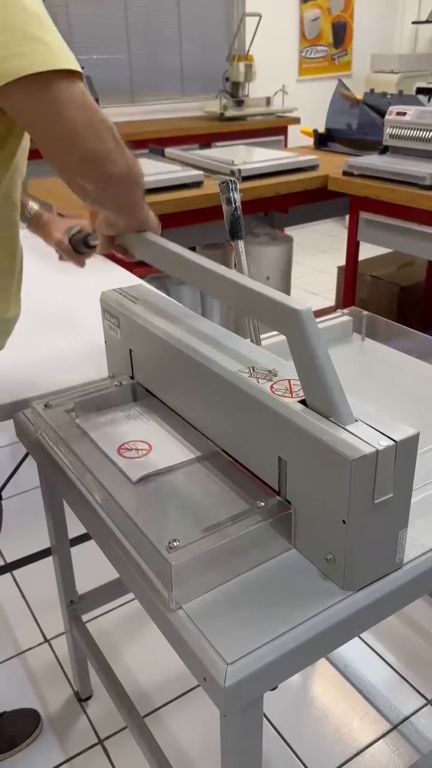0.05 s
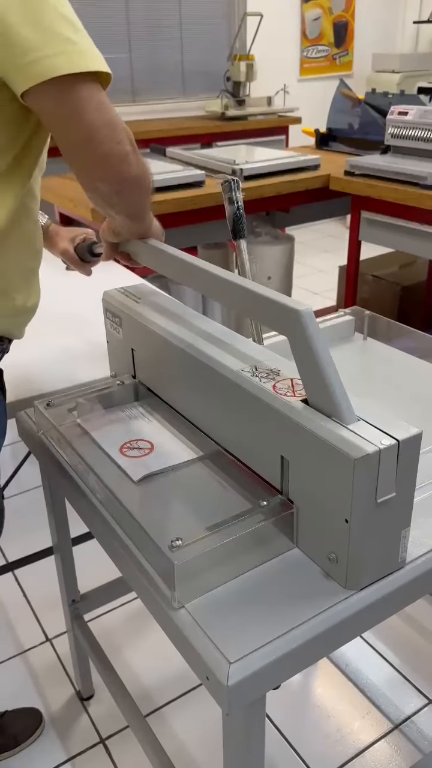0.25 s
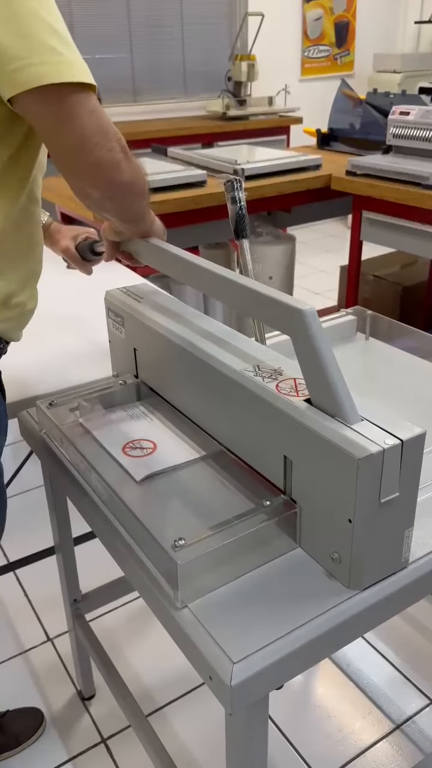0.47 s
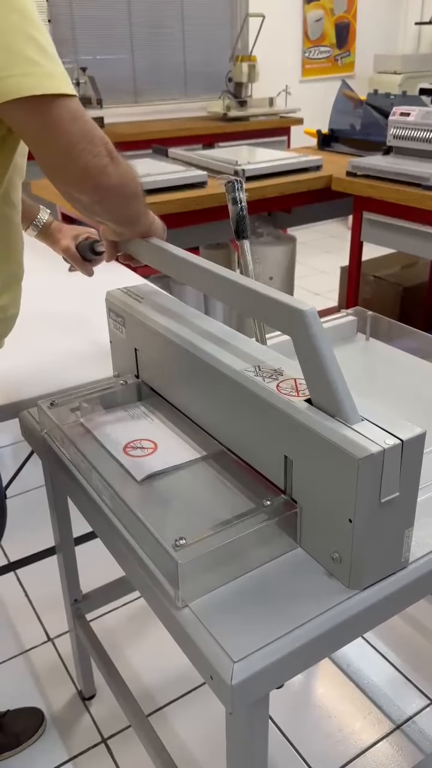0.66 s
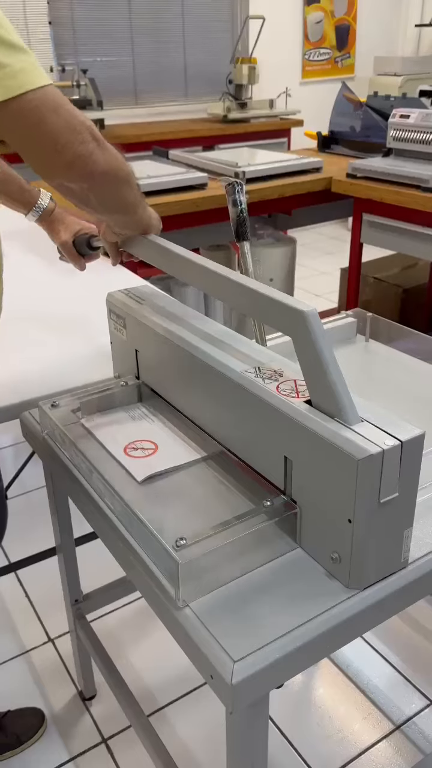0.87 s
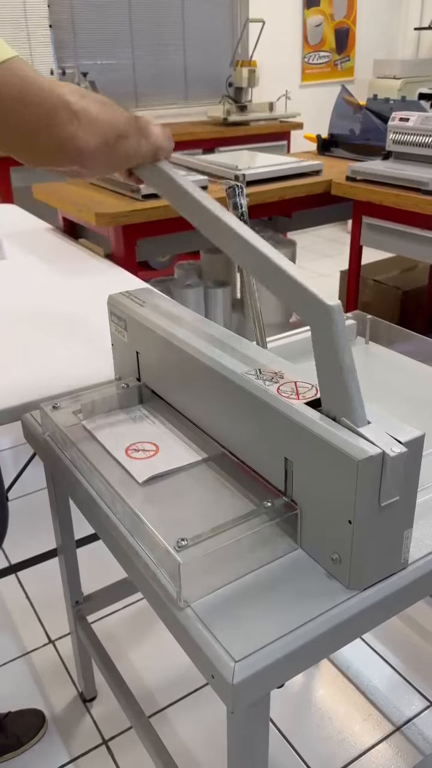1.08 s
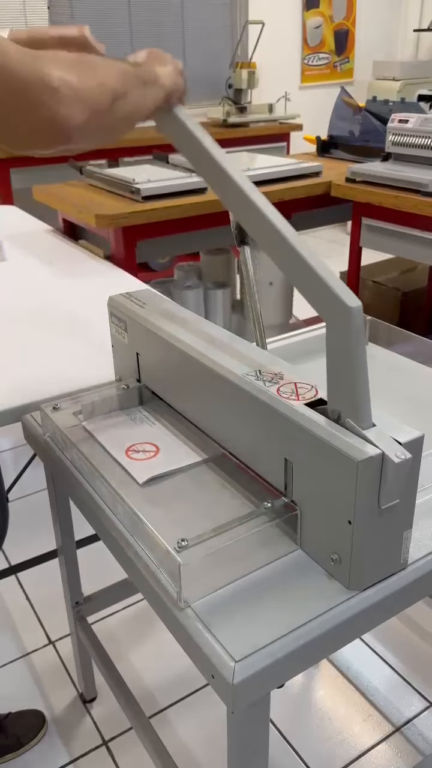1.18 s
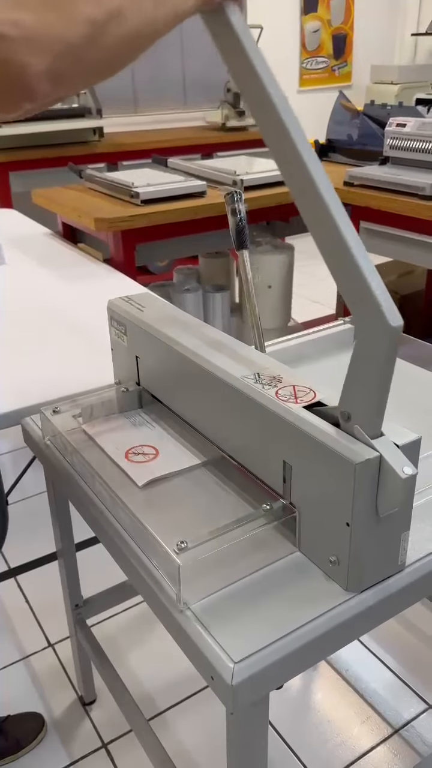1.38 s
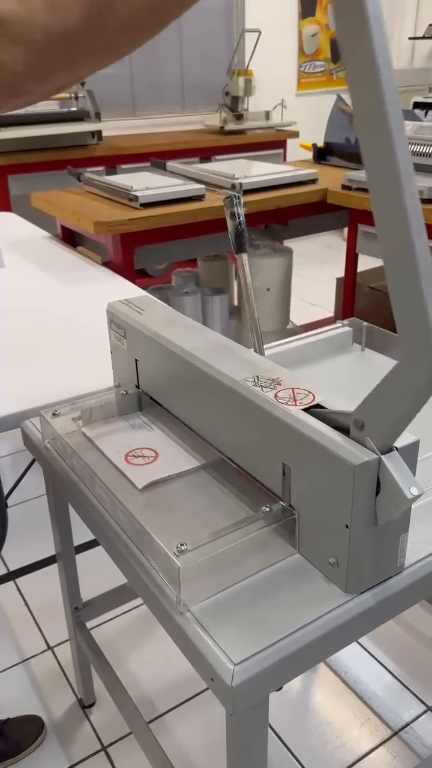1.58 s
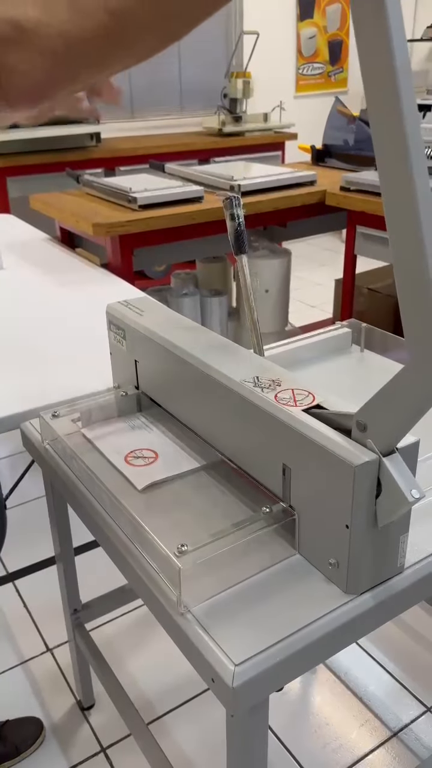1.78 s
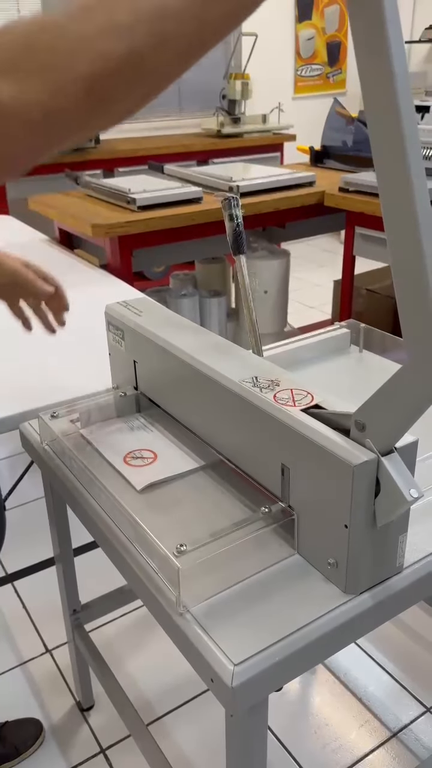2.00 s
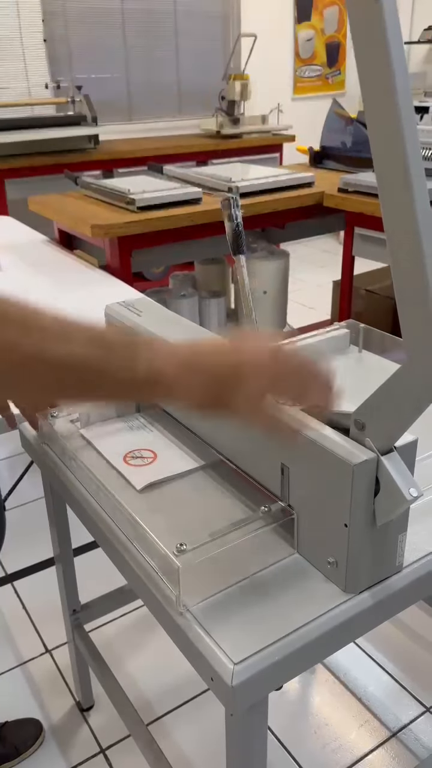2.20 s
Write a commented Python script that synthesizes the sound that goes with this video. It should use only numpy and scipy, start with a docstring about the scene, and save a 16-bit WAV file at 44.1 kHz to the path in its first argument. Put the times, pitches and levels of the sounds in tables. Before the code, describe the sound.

A lever paper cutter crunches through paper, then scrapes up and slams with a rattle.

```python
"""A crunch and a heavy clunk, then a scraping slide and a rattling steel slam: a lever paper guillotine
on a steel stand, close by in a tiled shop. The blade snaps through a stack of sheets and bottoms out.
The lever pulls free with a ping and a thump, groans up on its pivot and slams into its top catch,
which shakes the stand. Every contact rings the same frame and steel parts, over a low hum."""
import sys
import numpy as np
from scipy import signal
from scipy.fft import rfft, irfft
from scipy.io import wavfile

SR = 44100
rng = np.random.default_rng(int(sys.argv[2]) if len(sys.argv) > 2 else 0)


def digitize_waveform(pressure):
    """Quantize a signal to 16-bit integers and store it at the path in sys.argv[1].

    Rows of a 2-D input are taken as channels; values are limited to [-1, 1].
    """
    field = np.atleast_2d(pressure).T
    bounded = np.clip(field, -1, 1)
    quanta = np.round(bounded * 32767).astype(np.int16)
    wavfile.write(sys.argv[1], SR, quanta)


N = 99225


def amp(db):
    """Decibels to amplitude."""
    return 10 ** (np.asarray(db) / 20)


def at_hz(points, hz):
    """Read (Hz, value) points on a log-frequency axis."""
    freqs, values = np.array(points, float).T
    return np.interp(np.log(np.maximum(hz, 1)), np.log(freqs), values)


def conv(a, b):
    """Convolve along time, channel by channel."""
    return signal.fftconvolve(np.atleast_2d(a), np.atleast_2d(b), axes=-1)[:, :N]


def colour(x, points, size=4096):
    """Minimum-phase EQ through (Hz, dB) points: nothing rings ahead of an attack."""
    gain = amp(at_hz(points, np.fft.rfftfreq(size, 1 / SR)))
    cepstrum = irfft(np.log(gain))
    cepstrum[1:size // 2] *= 2
    cepstrum[size // 2 + 1:] = 0
    return conv(x, irfft(np.exp(rfft(cepstrum))))


def unit(x):
    """Scale to unit energy."""
    return x / np.sqrt(np.sum(x ** 2, axis=-1, keepdims=True))


def wash(t60s, build_s, size=32768, bands=14):
    """Countless overlapping rings as mid and side noise, each band dying at its own rate."""
    t, f = np.arange(size) / SR, np.fft.rfftfreq(size, 1 / SR)
    centres = np.geomspace(50, 12000, bands)
    noise, out = rfft(rng.standard_normal((2, size))), 0
    for hz, row in zip(centres, np.eye(bands)):
        share = at_hz(list(zip(centres, row)), f)
        envelope = np.exp(-np.log(1000) * t / at_hz(t60s, hz)) * (1 - np.exp(-t / build_s))
        out = out + unit(irfft(noise * share) * envelope) * np.sqrt(share.mean())
    return out


def modes(table):
    """One decaying sine per (Hz, dB, t60) row; the level sets its energy."""
    t = np.arange(N) / SR
    return np.array([amp(db) * unit(np.sin(2 * np.pi * hz * t) * np.exp(-np.log(1000) * t / t60))
                     for hz, db, t60 in table])


def strike(table, at_s, db):
    """One hit sets all the modes of a part ringing together."""
    return amp(db) * np.pad(modes(table).sum(axis=0), (int(at_s * SR), 0))[:N]


def grains(times, dbs, per_s, spread_db):
    """Tiny uneven clicks riding a level curve; 0 dB carries the energy of fifty unit clicks a second."""
    clicks = (rng.random(N) < per_s / SR) * rng.choice([-1, 1], N)
    strength = amp(spread_db * np.minimum(rng.exponential(size=N), 4))
    envelope = amp(np.interp(np.arange(N) / SR, times, dbs, left=-120, right=-120))
    return unit(clicks * strength) * np.sqrt(50 * N / SR) * envelope


def shop_tone(air_db=-56.5, hum_hz=56.6, hum_db=-58.5):
    """The bed: faint air noise and a low mains hum."""
    # spectrum of the shop's air (frequency [Hz], level [dB])
    air_eq = [(20, 16.5), (60, 7), (100, 11.5), (300, 1.5), (650, -10), (1000, -14), (3000, -15),
              (6500, -27.5), (10000, -53)]
    air = unit(colour(rng.standard_normal((2, N)), air_eq)) * np.sqrt(N)
    hum = np.sqrt(2) * np.sin(2 * np.pi * hum_hz * np.arange(N) / SR)
    return amp(air_db) * air + amp(hum_db) * hum


def tiled_room(x):
    """Hard tiles throw back a bright, diffuse tail."""
    # decay of the room (frequency [Hz], t60 [s])
    room_t60 = [(60, 0.42), (300, 0.58), (1000, 0.56), (2500, 0.71), (5000, 0.69), (7000, 1), (10000, 0.14)]
    # tone of the tail (frequency [Hz], gain [dB])
    room_eq = [(60, -7), (350, -12), (1000, -20.5), (2500, -6), (5500, -4.5), (10000, -9.5)]
    return conv(x, colour(wash(room_t60, build_s=0.0032), room_eq))


def housing():
    """The housing sings on faintly after the blade bottoms out and after the slam."""
    # long rings of the housing (frequency [Hz], level [dB], t60 [s])
    housing_modes = [(560, -6, 1.0), (673, -3, 1.7), (754, -3, 1.0), (825, -1.5, 1.1), (1039, -7, .8)]
    # the two heavy blows that wake it (time [s], level [dB])
    hits = [(0.15, -15), (1.768, -16)]
    return sum(strike(housing_modes, at_s, db) for at_s, db in hits)


def catch_ping():
    """The safety catch lets go with a small ping just before the lever comes free."""
    # short rings of the catch (frequency [Hz], level [dB], t60 [s])
    ping_modes = [(1494, -13, 0.043), (1527, 7.5, 0.091), (1750, -19, 0.046)]
    return strike(ping_modes, at_s=0.906, db=-30.5)


def carrier_thump():
    """The heavy blade carrier jumps clear of the stack with a dull thump."""
    # low rings of the carrier (frequency [Hz], level [dB], t60 [s])
    thump_modes = [(123, -11.5, 0.19), (185, -13.5, 0.13), (198, 0.5, 0.23)]
    return strike(thump_modes, at_s=0.957, db=-3)


def response(rings, rise_s=0.0027, hard_s=0.0019):
    """The machine tapped at one spot: a push, a crack, the panels, and each mode in random polarity."""
    # decay of the panels' dense ring (frequency [Hz], t60 [s])
    panel_t60 = [(60, 0.22), (200, 0.27), (500, 0.2), (1500, 0.19), (4000, 0.13), (10000, 0.1)]
    t = np.arange(N) / SR
    panels = amp(0.5) * wash(panel_t60, build_s=0.0023, size=16384)
    panels = np.pad(panels, ((0, 0), (0, N - panels.shape[1])))
    crack = amp(-4.5) * unit(rng.standard_normal((2, N)) * np.exp(-t / 0.0018))
    ringing = rng.choice([-1., 1.], (2, len(rings))) @ rings
    push = (t == 0) * amp(-4.5) * np.exp(-rise_s / hard_s)  # weaker for soft, slow contacts
    return (ringing + crack + panels) * (1 - np.exp(-t / rise_s)) + push


def stand_shudder():
    """After the slam the legs knock unevenly on the tiles and settle into a low rumble."""
    # strength of the shudder (time [s], level [dB])
    shudder = [(1.8, -17), (1.9, -10.5), (2.02, -9.5), (2.11, -17), (2.17, -17.5), (2.25, -17.5)]
    # tone of the knocks (frequency [Hz], gain [dB])
    knock_eq = [(30, -15), (55, 10), (80, -14), (125, 0.5), (190, -16.5), (300, -12.5), (700, -27),
                (3000, -22)]
    # rings of the legs (frequency [Hz], level [dB], t60 [s])
    leg_modes = [(53.4, -19, 0.55), (122.6, -18, 0.43), (179, -20, .2)]
    knocks = grains(*np.array(shudder).T, per_s=130, spread_db=1)
    return conv(colour(knocks, knock_eq), response(modes(leg_modes)))


def lever_slide(rings, slips_per_s=1700):
    """Pivot and blade guide stick and slip as the lever rises."""
    # friction along the upstroke (time [s], pivot groan [dB], blade scrape [dB])
    friction = [(.98, -20, -28), (1.05, -33, -35.5), (1.121, -34.5, -40), (1.19, -24.5, -34.5),
                (1.28, -34, -46.5), (1.388, -34.5, -33), (1.42, -26.5, -25.5), (1.49, -27, -25.5),
                (1.56, -22.5, -21.5), (1.68, -28.5, -15.5), (1.72, -46, -45)]
    # hollow voice of the pivot (frequency [Hz], gain [dB])
    groan_eq = [(60, -11.5), (200, -1), (330, 1), (420, 8.5), (600, 1), (1000, -7), (3000, -24.5)]
    # rasp of the blade (frequency [Hz], gain [dB])
    scrape_eq = [(200, -13), (800, -6.5), (1900, -2.5), (3500, -12.5), (8000, -15)]
    times, groan_db, scrape_db = np.array(friction).T
    groan = colour(grains(times, groan_db, slips_per_s, spread_db=2), groan_eq)
    scrape = colour(grains(times, scrape_db, slips_per_s, spread_db=2), scrape_eq)
    return conv(groan + scrape, response(rings))


def edge_snaps(skirt_db=-19):
    """Sharp steel edges snap past each other in very short, bright bursts."""
    # edges letting go (time [s], level [dB], centre [Hz], decay [s])
    snaps = [(0.147, -11, 7000, .003), (0.932, -19, 9300, .0025), (1.408, -38, 8500, .003),
             (1.703, -12, 7500, .007), (1.7628, -4, 8300, .005)]
    t, out = np.arange(N) / SR, np.zeros((2, N))
    for at_s, db, hz, decay_s in snaps:
        start = int(at_s * SR)
        band = [(hz / 4, 3 * skirt_db), (hz / np.sqrt(2), skirt_db), (hz, 0), (hz * np.sqrt(2), skirt_db)]
        burst = rng.standard_normal((2, N)) * np.exp(-t / decay_s)
        out[:, start:] += amp(db) * unit(colour(burst, band))[:, :N - start]
    return out


def paper_crunch(rings):
    """Sheets give way one after another under the blade, each ringing the machine."""
    # blade pressing through the stack (time [s], level [dB])
    pressure = [(0, -24.5), (.04, -23.5), (0.069, -10.5), (.11, -6), (.15, -13.5), (.19, -17.5), (.26, -18),
                (0.321, -24.5), (0.369, -42.5)]
    # tone of the parting sheets (frequency [Hz], gain [dB])
    sheet_eq = [(60, -2), (150, -1), (400, 1.5), (1500, -0.5), (4000, 0.5), (9000, 5.5)]
    sheets = grains(*np.array(pressure).T, per_s=450, spread_db=4.5)
    return conv(colour(sheets, sheet_eq), response(rings))


def metallic_tone(x):
    """Narrow peaks and dips give the downstroke its metallic tone, with a plain EQ notch at 4.7 kHz."""
    # bell-shaped EQ bands (centre [Hz], width [Hz], gain [dB])
    eq_bands = [(360, 40, 2), (1254, 150, 0), (1481, 110, 0.5), (2090, 60, 4), (2260, 170, -4.5),
                (2620, 73, 4), (2760, 88, -6), (2948, 94, 3), (4210, 80, 0.5), (4700, 160, -4.5),
                (5920, 410, 5.5)]
    f = np.linspace(20, 12000, 1200)
    gain_db = sum(db * np.exp(-.5 * ((f - hz) / width) ** 2) for hz, width, db in eq_bands)
    return colour(x, list(zip(f, gain_db)))


def steel_blows(rings, from_s=0, until_s=np.inf):
    """Metal meets metal; each contact has its own attack and its own balance from thud to tick."""
    # lever, blade and catch (time [s], rise [s], thud [dB], knock [dB], body [dB], clang [dB], tick [dB])
    contacts = [(0.04, 0.015, -33, -11.5, -11.5, -23.5, -30.5), (0.071, 0.0016, -23.5, -25, -30, -43, -15),
                (0.094, 0.0011, -3, -3.5, -3, -7, -8), (0.105, 0.00065, -16, -19, -6, -10, -26),
                (0.116, 0.0003, -18, 7.5, 0, 0, -12.5), (0.135, 0.0014, -14, -5, -10.5, -7.5, 0.5),
                (0.145, 0.0003, -7, -7, -0.5, 1, -12.5), (0.1471, 0.00024, -13, -7, -2.5, 0.5, 4.5),
                (0.1496, 0.00015, -10, -5.5, -1.5, 6.5, -7.5), (0.156, 0.00034, -5, -3.5, 2.5, -9.5, -9),
                (0.171, 0.001, -2.5, -13, -24, -14, -22), (0.200, 0.0011, 3, -18, -10, -9, -9.5),
                (0.225, 0.00081, -2.5, -12.5, -14.5, -13.5, -6),
                (0.317, 0.00065, -6, -19, -20, -13.5, -14.5),
                (0.906, 0.0011, -47, -43.5, -41.5, -31.5, -25.5),
                (0.931, 0.002, -36, -38, -20.5, -11, -10.5), (0.952, 0.00066, -17, -26, -5.5, -9.5, -15.5),
                (0.955, 0.0013, -27.5, -5.5, -12, -33, -36), (0.965, 0.00088, -15, -4.5, -11.5, -15.5, -12),
                (1.034, .003, -11, -13.5, -15.5, -54, -31), (1.258, 0.00034, -16, -26, -34, -38, -40),
                (1.408, 0.001, -15, -20, -25.5, -21.5, -28), (1.681, 0.0018, -31, -10.5, -0.5, -1.5, 0),
                (1.7013, 0.0013, 3, -7.5, 4.5, -0.5, 10.5), (1.708, 0.00083, 4, -11.5, 2.5, -4.5, 9.5),
                (1.72, 0.00078, 3.5, 5, -1, -2.5, -17), (1.731, 0.0005, -12, -11, -25, 2.5, -11),
                (1.749, 0.00046, -3, 1, -10, -12, -8), (1.7625, 0.00017, 3.5, 4, -7, -7, 14.5),
                (1.768, 0.00049, -6, -13, -4.5, 3.5, 5), (1.801, 0.00061, 4, -40, -7, -7, -10),
                (1.845, 0.00086, 7, 2, -6.5, -7, 4.5), (1.867, 0.002, 2, 0, -13, -10, 7),
                (1.893, 0.0026, 1.5, -8.5, -12, -9.5, -6), (1.922, 0.004, -11, 2, -35, -37, -13),
                (1.975, 0.0027, -3.5, -11, -30, -21, -10.5)]
    # where thud, knock, body, clang and tick sit (frequency [Hz])
    bands_hz = [70, 190, 470, 1700, 6500]
    out = np.zeros((2, N))
    for at_s, rise_s, *band_dbs in contacts:
        if from_s <= at_s < until_s:
            start = int(at_s * SR)
            blow = response(rings, rise_s)[:, :N - start]
            out[:, start:] += colour(blow, list(zip(bands_hz, band_dbs)))[:, :N - start]
    return out


def scene(blade_free_s=0.8, machine_db=25.5):
    """One stroke down and back up; side EQ leaves it nearly mono around 2 kHz and abruptly wide above."""
    # rings of frame and stand (frequency [Hz], level [dB], t60 [s])
    frame_modes = [(65, -23, 3.5), (191.6, -21.5, 0.16), (272, -22.5, .3), (334.8, -21, 0.38),
                   (370.1, -17.5, 0.16), (395.8, -35, 0.96), (469.6, -27, 0.085), (552, -34.5, 0.49),
                   (597.4, -24.5, 0.29), (684, -30, 0.24), (775.4, -24, 0.42), (971, -23.5, 0.13),
                   (1266, -24, .28), (2054, -25.5, 0.067)]
    # rings of blade and catch (frequency [Hz], level [dB], t60 [s])
    steel_modes = [(1395, -25, 0.2), (1746, -33.5, 0.33), (2436, -20.5, .22), (2552, -27.5, .28),
                   (2934, -30, .2), (4040, -27.5, 0.27), (4190, -22, 0.27), (4664, -24, 0.13),
                   (4916, -30, 0.35), (5860, -20.5, 0.27), (6730, -24, 1), (6780, -25, 0.35),
                   (9300, -20.5, 0.13)]
    # overall tone of the machine (frequency [Hz], gain [dB])
    machine_eq = [(25, -21), (60, -12.5), (130, -8.5), (220, -5), (370, -3), (650, -5), (1100, -11.5),
                  (2050, -14.5), (3300, -22), (5300, -29.5), (6900, -31.5), (9500, -44), (10300, -51.5),
                  (11500, -66)]
    # side-channel EQ of the direct sound (frequency [Hz], gain [dB])
    direct_side_eq = [(60, -30.5), (200, -38.5), (450, -20), (800, -29), (1200, -31), (2100, -41.5),
                      (2400, -6), (3200, -5.5), (5900, -7.5), (7200, -1), (9500, 9), (10700, 20.5)]
    # side-channel EQ of the tail and the bed (frequency [Hz], gain [dB])
    tail_side_eq = [(60, -28.5), (200, -28.5), (800, -3.5), (1200, -13), (2100, -32), (2400, 0.5),
                    (3200, -0.5), (5900, -3), (7200, -5), (9500, 8.5), (10700, 27)]
    rings = modes(frame_modes + steel_modes)
    downstroke = metallic_tone(steel_blows(rings, until_s=blade_free_s) + paper_crunch(rings))
    upstroke = steel_blows(rings, from_s=blade_free_s) + lever_slide(rings) + stand_shudder()
    machine = amp(machine_db) * colour(downstroke + upstroke, machine_eq)
    machine += catch_ping() + carrier_thump() + housing()
    room = tiled_room(machine[0]) + shop_tone()
    mid = machine[0] + room[0]
    side = colour(machine[1], direct_side_eq)[0] + colour(room[1], tail_side_eq)[0]
    return np.array([mid + side, mid - side]) + edge_snaps()  # the snaps stay dry


def record(dry, top_hz=11300):
    """A steep low-pass shaves off the highest treble."""
    return signal.sosfilt(signal.ellip(8, .2, 70, top_hz, fs=SR, output="sos"), dry)


dry = scene()
out = record(dry)
digitize_waveform(out)
```